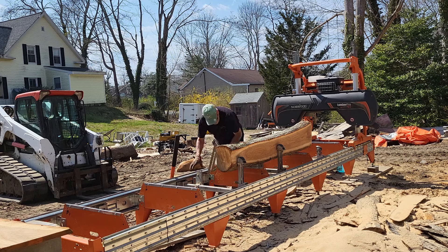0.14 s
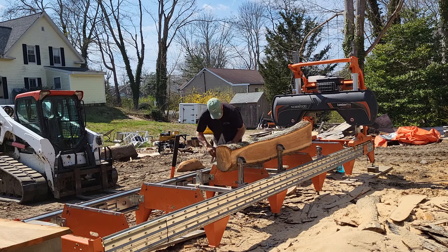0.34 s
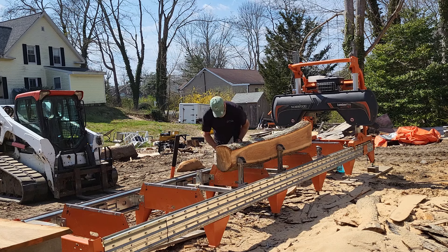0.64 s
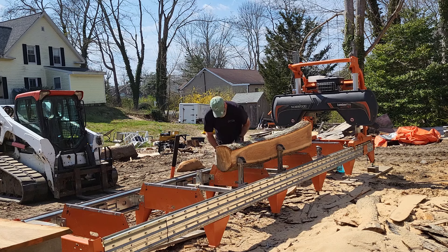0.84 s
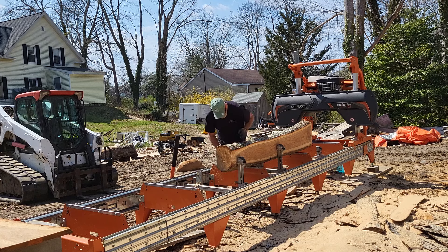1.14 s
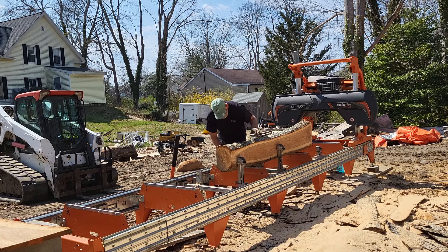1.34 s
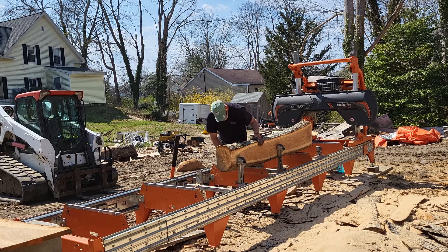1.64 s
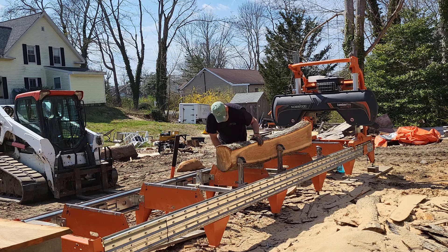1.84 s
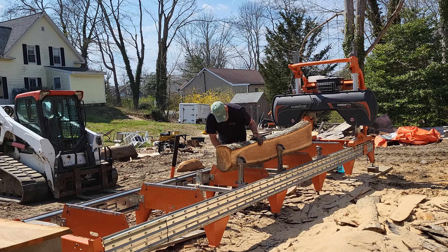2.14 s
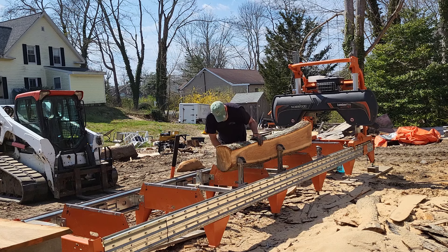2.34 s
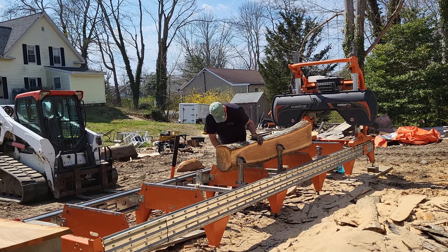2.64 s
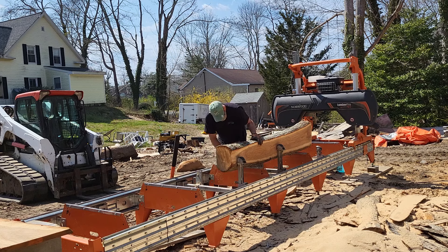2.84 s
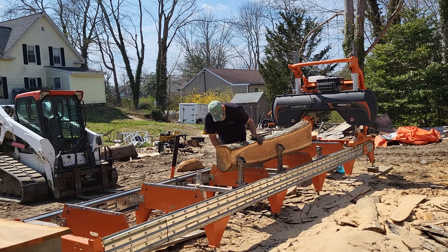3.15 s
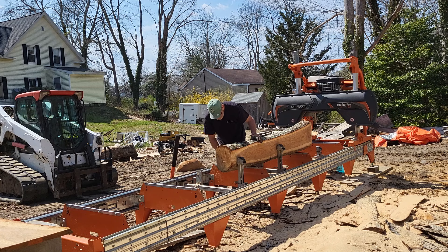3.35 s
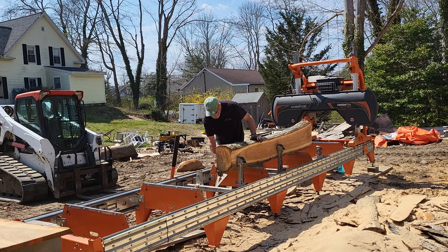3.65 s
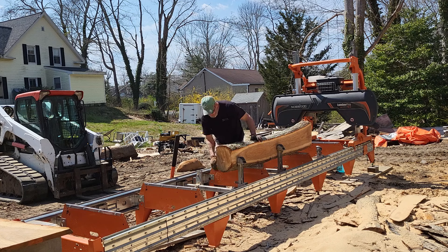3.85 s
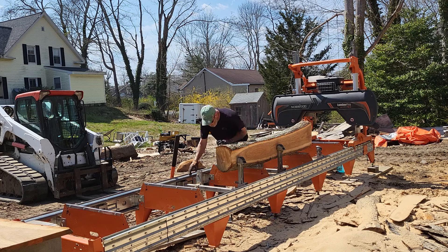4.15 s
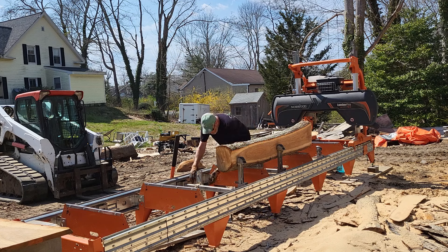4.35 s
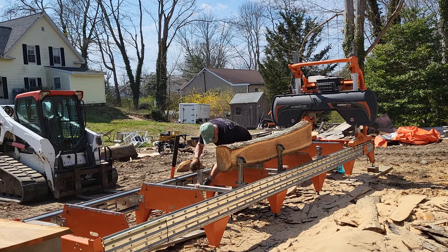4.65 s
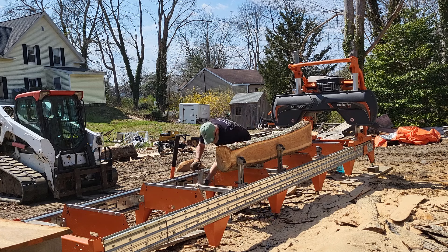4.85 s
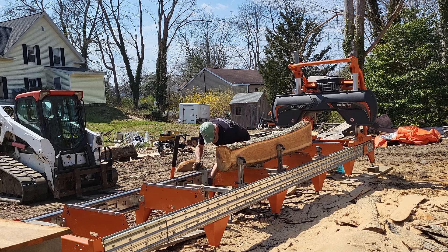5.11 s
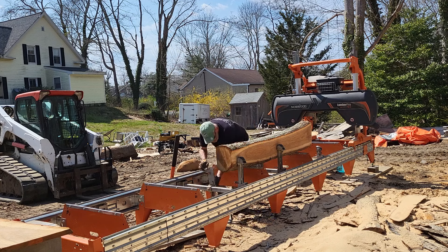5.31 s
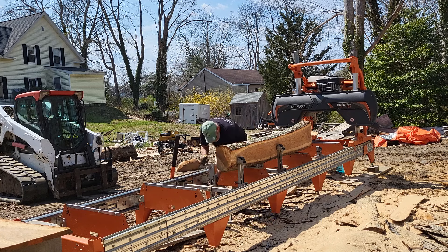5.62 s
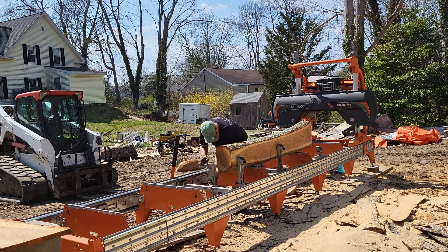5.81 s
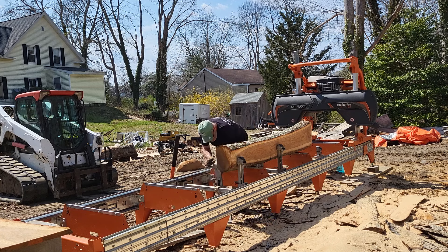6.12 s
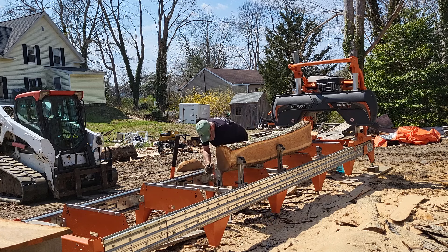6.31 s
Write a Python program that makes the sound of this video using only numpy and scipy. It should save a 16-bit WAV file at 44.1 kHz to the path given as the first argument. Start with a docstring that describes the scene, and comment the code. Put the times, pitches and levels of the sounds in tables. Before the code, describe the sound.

Outdoors in an open yard, a diesel idles faintly throughout, a low hum and roar with soft puttering about fifteen times a second, softer after 4 s. At 0.9 s a latch clacks and a steel stop bangs loudly, short and bright; at 1.4 s a post clanks with a drier ring. A lull follows: from 2.2 to 3.7 s distant birds chirp in quick gliding notes, and bark rustles softly around 2.6-2.9 s. A faint steel scrape from 3.4 s leads to a hard rail clang at 3.94 s, ringing longest, with dull follow-up knocks and a tiny tick at 4.4 s. A low log thud comes near 4.5 s. From 4.7 s a clamp bangs, drags and rattles unevenly, with high pin chimes, thinning after 5.6 s. At 6.15 s it locks with a hard double clank and low thud, then a light tap at 6.47 s.

```python
"""Clanks on a sawmill bed

A steel log stop, a post and a clamp clank against the bed in an open yard: noise crashes plus decaying modes.
Dull follow-up knocks and a tick trail the rail blows. The clamp is dragged along its bar and rattles:
random slips drive resonances. Bark rustles and the log thuds.
A diesel idles further off, built of hum, knock, casing ring and roar; birds sing in gliding near-sine notes.
A peak limiter holds the hardest blows."""
import sys
import numpy as np
from scipy import signal
from scipy.fft import rfft, irfft
from scipy.io import wavfile
from scipy.ndimage import uniform_filter1d, minimum_filter1d

SR = 44100
rng = np.random.default_rng(int(sys.argv[2]) if len(sys.argv) > 2 else 0)


def master(y):
    """Save y as 16-bit WAV."""
    cut = np.clip(np.atleast_2d(y).T, -1, 1)
    pcm = np.round(cut * 32767)  # scale
    wavfile.write(sys.argv[1], SR, pcm.astype(np.int16))


N = 285591  # length in samples


def amp(db):
    """Gain of a level in dB."""
    return 10 ** (np.asarray(db) / 20)


def evened(x):
    """Scales to rms 1."""
    return x / np.sqrt(np.mean(x ** 2) + 1e-20)


def read(points, hz):
    """Value of a spectrum table on a log-frequency axis."""
    f, value = np.transpose(points)
    return np.interp(np.log(hz + 1), np.log(f + 1), value)


def along(rows):
    """Sample times and columns of a curve."""
    s, *columns = np.transpose(rows)
    t = np.arange(s[0], s[-1], 1 / SR)
    return [t] + [np.interp(t, s, c) for c in columns]


def add(mix, s, sound):
    """Mixes a sound in at time s."""
    part = mix[max(round(s * SR), 0):][:len(sound)]
    part += sound[:len(part)]


def resonate(x, hz, width):
    """Two-pole resonance of peak gain 1."""
    return signal.lfilter(*signal.iirpeak(hz, hz / max(width, 5), SR), x)


def twice(x, hz, width):
    """A resonance with steep skirts."""
    return resonate(resonate(x, hz, width), hz, width)


def engine_roar():
    """Broadband noise whose spectrum shifts in slow random patches, under all the rest."""
    # engine roar spectrum: f/Hz, level per Hz/dB
    roar_spectrum = [(15, -47.5), (30, -44.5), (60, -8.5), (120, -10.5), (200, -6), (340, -21), (400, -15),
                     (550, -12.5), (950, -19), (1300, -18), (2100, -30), (3300, -33.5), (5200, -39),
                     (7000, -53.5), (15000, -66)]
    hz, _, z = signal.stft(rng.standard_normal(N), SR, nperseg=2048)
    patches = uniform_filter1d(rng.standard_normal(z.shape), size=14, axis=0)
    patches = evened(uniform_filter1d(patches, size=6, axis=1))
    field = z * amp(read(roar_spectrum, hz)[:, None] + 0.5 * patches)
    return evened(signal.istft(field, SR, nperseg=2048)[1][:N])


def engine_hum(turns):
    """Sines at multiples of the cycle rate, with one shared slow wander of the phase."""
    # engine orders: multiple of the cycle rate, level/dB
    orders = [(3, -16.5), (5, -4.5), (24, -9)]
    wander = evened(signal.lfilter([1], [1, -np.exp(-25. / SR)], rng.standard_normal(N)))
    hum = sum(amp(db) * np.sin(2 * np.pi * (k * (turns + .006 * wander) + rng.random()))
              for k, db in orders)
    swell = 1 + 0.04 * np.cos(2 * np.pi * (turns - .3))  # after each knock
    return np.sqrt(2) * hum * swell


def exhaust_knock(turns, cycle_hz):
    """One short upward sweep a cycle, of uneven strength, with a weaker firing after it."""
    u = turns % 1 / cycle_hz  # seconds into the cycle
    strength = amp(1.2 * rng.standard_normal(size=200))[turns.astype(int) + 1]
    sweep = np.sin(2 * np.pi * (85 * u + 11000 * u ** 2))
    knock = strength * sweep * np.exp(-((u - .0075) / .0055) ** 2)
    knock += 0.088 * np.roll(knock, round(.44 * SR / cycle_hz))
    knock -= uniform_filter1d(knock, size=900)  # no steady push carries through open air
    return evened(knock)


def casing_ring(turns):
    """Noise pulsing with the cycle excites two resonances of the casing."""
    gate = 0.93 + np.exp(-((turns - .15) % 1) / 0.39)
    main = twice(gate * rng.standard_normal(N), 805, 51)
    side = twice(gate * rng.standard_normal(N), 755, 66)
    return evened(main + 0.5 * side)


def engine():
    """Idling diesel: hum and knock follow the roar level; the casing has a level of its own."""
    # engine levels: t/s, roar level/dB, casing ring level/dB
    levels = [(0.0, -49.5, -69.5), (.5, -50.5, -55.5), (1.9, -55, -60), (2.999, -51, -52),
              (4.1, -52.5, -69.5), (5.299, -55.5, -47), (6.48, -54, -58.5)]
    cycle_hz, first_s = 14.57, .012
    hum_over_db, knock_over_db = 2, -2  # relative to the roar
    fade_from_s, fade_lasts_s, fade_db = 3.9, .9, -16  # the knock softens and stays soft
    t = np.arange(N) / SR
    s, *columns = np.transpose(levels)
    roar_db, casing_db = (np.interp(t, s, c) for c in columns)
    knock_db = roar_db + knock_over_db + fade_db * np.clip((t - fade_from_s) / fade_lasts_s, 0, 1)
    turns = (t - first_s) * cycle_hz
    low = amp(roar_db + hum_over_db) * engine_hum(turns) + amp(roar_db) * engine_roar()
    return low + amp(knock_db) * exhaust_knock(turns, cycle_hz) + amp(casing_db) * casing_ring(turns)


def birds():
    """Near-sine notes from afar, blurred by echoes off trees and houses."""
    # three-note phrase, one list a note: t from the phrase start/s, f/Hz, level/dB
    phrase = [
        [(0, 2919, -4), (.012, 2767, -2), (.04, 2680, -5)],
        [(.066, 2658, 7), (.08, 2889, 9.5), (.1, 3326, -1.5), (.145, 3420, -4.5)],
        [(.228, 3274, -9), (.24, 3094, 5), (.27, 2936, -17)],
    ]
    # starts of the phrase: t/s, level/dB
    phrases = [(2.205, -61.5), (2.522, -57.5), (2.838, -58.5), (3.154, -55.5), (3.477, -62.5)]
    # a second bird's single note: t/s, level/dB, f/Hz
    answers = [(2.808, -55.5, 2369), (3.429, -54, 2440)]
    answer_note = [(0, 1.01, 8), (.02, 1, 2.5), (.05, 1.005, 3.5)]  # t/s, factor on f, level/dB
    out = np.zeros(N)
    notes = [(s, db, 1, note) for s, db in phrases for note in phrase]
    notes += [(s, db, hz, answer_note) for s, db, hz in answers]
    for s, db, factor, note in notes:
        t, hz, shape_db = along(note)
        rough_hz = factor * hz * (1 + .1 * rng.standard_normal(len(t)))
        tone = np.sin(2 * np.pi * np.cumsum(rough_hz) / SR) * signal.windows.tukey(len(t), .4)
        add(out, s + t[0], amp(db + shape_db) * tone)
    echoes = rng.standard_normal(SR // 4) * amp(-60 * np.arange(SR // 4) / SR / 0.2)  # t60 0.2 s
    return out + amp(0.5) * signal.oaconvolve(out, echoes / np.linalg.norm(echoes))[:N]


def bark_rustles():
    """Brushed bark: band noise that dies away exponentially."""
    # brushes: t/s, level/dB, decay time constant/s
    rustles = [(2.601, -59.5, 0.0695), (2.737, -55, 0.097), (2.834, -56.5, 0.049), (2.87, -75, 0.0414)]
    out = np.zeros(N)
    t = np.arange(SR // 4) / SR
    for s, db, length in rustles:
        noise = evened(twice(rng.standard_normal(len(t)), 1370, 1770))
        add(out, s, amp(db) * noise * np.exp(-t / abs(length)))
    return out


def log_thuds():
    """Low thuds of the log: a few swelling and dying cycles through a broad resonance."""
    # thuds: t/s, level/dB, f/Hz
    thuds = [(4.477, -30.5, 114.8), (4.497, -30.5, 81.5), (6.161, -18, 150.7)]
    out = np.zeros(N)
    for s, db, hz in thuds:
        u = np.arange(SR // 10) / SR * hz  # time in cycles
        push = np.sin(2 * np.pi * u) * 2.0 * u * np.exp(-1.3 * u)
        add(out, s, amp(db) * resonate(push, hz, 1.4 * hz))
    return out


def drag(rows, colour, peaks, edge_hz):
    """Uneven slips of steel on steel excite the body; their bare edge is the treble."""
    slips_per_s = 9000
    t, db = along(rows)
    edge_db = np.linspace(*colour[:2], len(t))
    tilt_db = np.linspace(*colour[2:], len(t))
    sizes = amp(2.2 * np.minimum(rng.exponential(size=len(t)), 3))
    slips = rng.standard_normal(len(t)) * (rng.random(len(t)) < slips_per_s / SR) * sizes
    low_hz = peaks[0][0]  # the tilt pivots here
    body = 0
    for hz, width, p in peaks:
        band = evened(twice(slips, hz, 2.195 * width)) * np.sqrt(width / 60)
        body = body + amp(p + tilt_db * np.log2(hz / low_hz)) * band
    edge = twice(twice(slips, edge_hz, edge_hz * 1.4), edge_hz, edge_hz * 1.4)
    sound = 0.2476 * body + amp(edge_db) * evened(edge)
    return t[0], amp(db) * sound * signal.windows.tukey(len(t), .05)


def drags():
    """Rail and clamp scrape, each with the resonances of its own body."""
    # drag levels: t/s, level/dB
    rail_levels = [(3.35, -65), (3.48, -50), (3.6, -52.5), (3.8, -51.5), (3.85, -59.5), (3.93, -59.5)]
    clamp_levels = [(4.4, -66), (4.594, -48.5), (4.736, -31.5), (4.906, -49), (5.15, -31.5), (5.25, -33.5),
                    (5.422, -37.5), (5.564, -45), (5.7, -44), (5.76, -59), (5.82, -56), (6.05, -56.5),
                    (6.14, -44.5), (6.2, -57)]
    # resonances of the rubbed body: f/Hz, base width/Hz, level/dB
    rail_peaks = [(1645.4, 85.6, 8), (2680, 137, -1.5), (3340, 91, -17), (3980, 33.5, -14),
                  (4354, 150, -13), (6180, 30, -38)]
    clamp_peaks = [(686.2, 47.9, 10.5), (1048, 150, -3), (1111, 8.3, -2.5), (1470, 9.9, -14),
                   (1506, 23, -3), (2171, 38, 0), (2547, 23, 1.5), (2920, 41, -10.5), (3200, 92, -4),
                   (3460, 37, -36.5), (4330, 46, -11), (5170, 26, -29)]
    # bare edge at start and end/dB, tilt of the body at start and end/dB per octave
    rail_colour = (-24.5, -5, 4, 5)
    clamp_colour = (-25.5, 0.5, -5, 3.21)
    out = np.zeros(N)
    add(out, *drag(rail_levels, rail_colour, rail_peaks, 3170))
    add(out, *drag(clamp_levels, clamp_colour, clamp_peaks, 3800))
    return out


def ring(modes, damped_s, size=24576):
    """Answer to one click: decaying sines, choked ever more (or swelling if damped_s is negative)."""
    t = np.arange(size) / SR
    out = np.zeros(size)
    for hz, db, t60 in modes:
        choke = np.exp(-(t / damped_s * (hz / 1500) ** .4) ** 3)  # high modes are choked sooner
        out += amp(db - 60 * t / max(t60, .02)) * np.sin(2 * np.pi * hz * t) * choke
    return out


def pin_chimes():
    """The clamp's loose pin chimes in long, high modes."""
    # pin modes: f/Hz, level/dB, t60/s
    pin_modes = [(5060, 0, .7), (9851, -11, .5), (10900, -20, .55), (11800, -25, .35), (14250, -14, .4)]
    # pin taps: t/s, level/dB, extra level above 10 kHz/dB
    taps = [(4.789, -30.5, -0.5), (4.845, -32, -18.5), (5.412, -52.5, 12.5)]
    out = np.zeros(N)
    for s, db, extra_db in taps:
        modes = [(hz, p + extra_db * (hz > 10000), t60) for hz, p, t60 in pin_modes]
        add(out, s, amp(db) * ring(modes, 1.3))
    return out


def crash_noise(colour_db, f, size, t60):
    """Many close frame modes as noise; each band builds up and dies at its own pace."""
    # crash spectrum: f/Hz, level per Hz/dB
    spectrum = [(90, -57.5), (150, -38), (380, -12.5), (700, -1), (1100, -2), (1800, -5), (3000, -3),
                (5000, -12), (9700, -24.5), (14000, -32), (15800, -49)]
    # decay by band: f/Hz, factor on t60
    lasts = [(200, 2.096), (800, 1.711), (2000, 0.97), (5000, 0.704), (12000, 0.74)]
    # build-up by band: f/Hz, time constant/ms
    lags = [(200, 11), (800, 17), (2000, 0.5), (6000, 1.9)]
    # crowded peaks and dips
    close_db = 4.7 * evened(uniform_filter1d(rng.standard_normal(size=len(f)), size=24))
    gain = amp(read(spectrum, f) + colour_db + close_db)
    steady = irfft(rfft(rng.standard_normal(size=size)) * gain)
    hz, t, z = signal.stft(steady, SR, nperseg=128, noverlap=96)
    dying = amp(-60 * t / (max(t60, .02) * read(lasts, hz)[:, None]))
    building = 1 - np.exp(-(t + 0.00033) * 1000 / abs(read(lags, hz))[:, None])
    return signal.istft(z * dying * building, SR, nperseg=128, noverlap=96)[1][:size]


def blow(row):
    """A crash of close frame modes plus the clear modes of a voice, both coloured by the contact."""
    # modes of the voices: f/Hz, level/dB, base t60/s
    latch_modes, stop_modes = [(1120, -3, .2), (1679, 0, .1), (2089, -14, .2), (2401, -6, .1),
                               (2569, -.6, .13), (2885, -9.5, .1), (3102, -3.5, .1), (3666, -8, .1),
                               (4474, -15, .11), (4613, -16, .2), (5642, -22, .2), (5898, -19, .2),
                               (6676, -13, .17), (7320, -22, .12)], [(802, -20, 0.4), (1120, 0, 0.046), (1723, -4, 0.11),
                                              (2089, 0, 0.08), (2579, -10, 0.13), (3068, -10, 0.11),
                                              (3252, -15, 0.22), (3639, -5, 0.068), (3887, -10, 0.071),
                                              (4172, -11, 0.073), (4350, -13, 0.11), (4635, -13, 0.087),
                                              (4872, -19, 0.12), (5658, -20, 0.1), (5884, -13, 0.1),
                                              (6013, -9, 0.081), (6783, -18, 0.1), (7321, -17, 0.062)]
    post_modes, rail_modes = [(334, -14, 0.25), (554, -7, 0.19), (802, -21, 0.25), (1007, -24, 0.3),
                              (1448, -16, 0.091), (1631, -23, 0.14), (2121, 0, 0.074), (2060, -26, 0.45),
                              (2000, -28, 0.4), (2579, -20, 0.15), (2659, -15, 0.11), (3090, -14, 0.077),
                              (3155, -3, 0.043), (3548, -18, 0.078), (4285, -25, 0.087), (6874, -17, 0.071)], [(592, -12, 0.23), (894, -17, 0.38), (1017, -18, 0.4),
                                            (1093, -15, 0.32), (1147, -12, 0.29), (1292, -6, 0.21),
                                            (1453, -14, 0.44), (1631, 0, 0.42), (1717, -3, 0.36),
                                            (1986, -6, 0.2), (2105, -22, 0.39), (2239, -9, 0.45),
                                            (2433, -27, 0.53), (2692, -3, 0.14), (2767, -7, 0.36),
                                            (2988, -23, 0.4), (3058, -10, 0.29), (3203, -17, 0.42),
                                            (3316, 0, 0.4), (3537, -3, 0.4), (3671, -11, 0.26),
                                            (3790, -12, 0.26), (4350, -25, 0.23), (4947, -18, 0.2),
                                            (5620, -22, 0.25)]
    # low-ringing voice of the clamp, lent to the dull knocks after the rail blows
    clamp_modes = [(145, -13, 0.21), (624, -9, 0.22), (958, 0, 0.15), (2186, -11, 0.16), (2487, -7, 0.11),
                   (2762, -7, 0.14), (3068, -7, 0.21), (3133, -3, 0.25), (1230, -12, .4), (4043, -22, 0.21),
                   (4646, -22, 0.26), (4990, -13, 0.13), (5572, -10, 0.092), (6568, -11, 0.12),
                   (7887, -7, 0.1)]
    # by voice: choke time by log and hand/s (negative: swells), factor on mode t60, clear ring/dB,
    # base rise/ms (its sign is ignored)
    voices = {"latch": (.1, 0.93, 5, 1.1), "stop": (0.21, .83, 0.79, .8), "post": (.15, .9, 1.5, 1.8),
              "rail": (0.2533, 2.633, 3.6, 1.9), "clamp": (-0.15, 1, -24, 0.5769),
              "locked clamp": (0.04, 0.9551, -4.5, -1.5)}
    # by voice: low and high pitch always favoured, f/Hz
    favoured = {"latch": (1130, 4600), "stop": (800, 3710), "post": (554, 2750), "rail": (1147, 3430),
                "clamp": (1090, 4600), "locked clamp": (900, 4040)}
    s, voice, db, bass_db, treble_db, middle_hz, t60 = row
    damped_s, free, ring_db, rise_ms = voices[voice]
    table = {"latch": latch_modes, "stop": stop_modes, "post": post_modes, "rail": rail_modes,
             "clamp": clamp_modes, "locked clamp": clamp_modes}[voice]
    answer = ring([(hz, p, free * lasts) for hz, p, lasts in table], damped_s)
    # the favoured pitches of the "clamp" voice shift a little from blow to blow
    shift = 1 + .07 * rng.standard_normal(size=2) * (voice == "clamp")
    low_hz, high_hz = np.array(favoured[voice]) * shift
    size, spot_hz = len(answer), (low_hz, middle_hz, high_hz)
    f = np.fft.rfftfreq(size, 1 / SR)
    top_db = -13.5 + 2.2 * treble_db  # the treble moves further at 14 kHz
    contact_db = read([(1000, bass_db), (1900, 0.00094), (3500, 0), (8000, treble_db), (14000, top_db)], f)
    spot_db = sum(9 * np.exp(-(np.log((f + 1) / hz) / 0.058) ** 2) for hz in spot_hz)
    crash = crash_noise(contact_db + spot_db, f, size, t60)
    # this filter is circular: the swelling end of the "clamp" voice wraps onto the start as a short snap
    modes = irfft(rfft(answer) * amp(contact_db + 0.14 * spot_db))
    head = slice(0, 600)  # the attack, where levels are matched
    clear_db = ring_db + 0.19 * db  # a light tap has less clear ring against its crash
    sound = crash / np.std(crash[head]) + amp(clear_db) * modes / np.std(modes[head])
    lingering = [(hz, p, 0.67 * t60) for hz, p in zip(spot_hz, (-9, -3.5, -14))]
    sound += ring(lingering, 0.19, size=size)
    sound /= abs(sound[head]).max()
    # a weak blow makes a longer, softer contact
    contact = abs(rise_ms) * amp(-.3 * min(db, 0)) * SR / 1000
    rise = 1 - np.exp(-np.arange(size) / (contact + 1))
    return s, (amp(db) * rise * sound)[:size - 2048]


def clanks():
    """Every blow on latch, stop, post, rail and clamp, with dull knocks and a tick after the rail."""
    # blows: t/s, voice, attack level before the rise/dB, bass below 1 kHz/dB,
    # treble at 8 kHz/dB, pitch favoured by the spot f/Hz, base t60 of the crash/s.
    # The voice names a set of modes. At 3.978 and 4.057 s it gives dull follow-up knocks of the rail
    # and at 4.386 s a tick: these borrow the low "clamp" voice, no clamp is struck.
    blows = [(.917, "latch", -13.5, 1, -19, 2606, 0.133), (0.928, "latch", -8, 2.5, -10.5, 1669, 0.182),
             (0.979, "stop", 7.5, 1, 5.5, 2060, 0.1562), (1.158, "latch", -44, -1, -7.5, 2934, 0.25),
             (1.368, "post", -1.5, 7.5, 7.5, 3666, 0.1492), (1.378, "post", 1.5, -9.5, 0, 1982, 0.113),
             (3.938, "rail", -6.5, 20.5, 5, 2900, 0.134), (3.945, "rail", 0, -15, -0.94, 1674, 0.407),
             (3.978, "clamp", 3.5, 6.5, 2.5, 1341, 0.0187), (4.057, "clamp", -20.5, -13, -4.5, 1447, 0.289),
             (4.386, "clamp", -46.5, -3, 6, 1466, 0.0724), (4.682, "clamp", -19, -3.5, 4.5, 2175, 0.139),
             (4.695, "clamp", -21, -4.5, 1.5, 2100, 1), (4.74, "clamp", 3, -9, 9.5, 2869, 0.241),
             (4.764, "clamp", -1, -2.5, -17, 2596, 0.086), (4.79, "clamp", 3.5, 3, 8, 2097, 0.0817),
             (4.845, "clamp", -5.5, -0.98, 5.5, 2135, 0.111),
             (4.885, "clamp", -29.5, 14.5, 13.5, 2256, 0.184), (4.946, "clamp", -28, -9.5, -9, 2140, 0.061),
             (4.98, "clamp", -15.5, -1, 6, 2376, 0.119), (5.048, "clamp", -12.5, -15, -20.5, 1934, 0.107),
             (5.086, "clamp", -14, 8.5, -0.5, 2380, 0.131), (5.104, "clamp", -18.5, 9, 4.5, 1401, 0.135),
             (5.167, "clamp", -16.5, 3, -6.5, 1567, 0.142), (5.278, "clamp", -11.5, 4.8, -1.5, 2437, 0.154),
             (5.332, "clamp", -18.5, -3, 5, 2311, 0.4), (5.359, "clamp", -11.5, 1.86, -1, 2910, 0.109),
             (5.38, "clamp", -6.5, -5, 1.45, 2242, 0.2035), (5.412, "clamp", -6, -7, 6, 2197, 0.1073),
             (5.444, "clamp", -16.5, -8, -32.5, 3029, 0.129),
             (5.498, "clamp", -25.5, 4, -28.5, 2276, 0.077), (5.544, "clamp", -9, -7, 1, 3120, 0.138),
             (5.675, "clamp", -17, -12, -8.5, 2763, 0.1128),
             (5.779, "clamp", -25.5, 12, -44.5, 3020, 0.103), (5.802, "clamp", -22, 2, -41, 2754, 0.174),
             (5.845, "clamp", -15.5, -15, -3.5, 2633, 0.1175), (5.885, "clamp", -16.5, -6, 4, 2468, 0.1114),
             (5.972, "clamp", -33.5, 16, 8.5, 2448, 0.115), (6.098, "locked clamp", -29.5, 1, 10, 1144, .2),
             (6.113, "clamp", -21.5, -7.5, 10, 2996, 0.44), (6.149, "clamp", 2, 0.93, 7, 2837, 0.1172),
             (6.163, "locked clamp", -0.35, 2, 8.5, 3189, 0.1218),
             (6.199, "clamp", -17.5, -1.5, 9.5, 3160, 0.115), (6.424, "clamp", -43, -0.5, -5, 2620, 0.46),
             (6.47, "clamp", -19, -24.5, -4, 2327, 0.056)]
    out = np.zeros(N)
    for row in blows:
        add(out, *blow(row))
    return out


def scene():
    """The yard, heard from one point."""
    background = engine() + birds()
    handling = bark_rustles() + log_thuds() + drags()
    return (background + handling + pin_chimes() + clanks())[None]


def record(dry):
    """Peak limiter with a quick grip and slower release, then the band limit."""
    edge_hz = 15600
    peak_db = 20 * np.log10(-minimum_filter1d(-abs(dry[0]), size=64) + 1e-9)
    fall = np.arange(N) * 160.0 / SR  # releases at 160 dB a second
    envelope_db = np.maximum.accumulate(peak_db + fall) - fall
    over_db = np.maximum(envelope_db + .7, 0)  # ceiling at -0.7 dB
    held = dry / amp(uniform_filter1d(over_db, size=32))
    lowpass = signal.firwin(511, edge_hz, window=("kaiser", 9), fs=SR)
    return signal.oaconvolve(held, lowpass[None], "same")


dry = scene()
out = record(dry)
master(out)
```